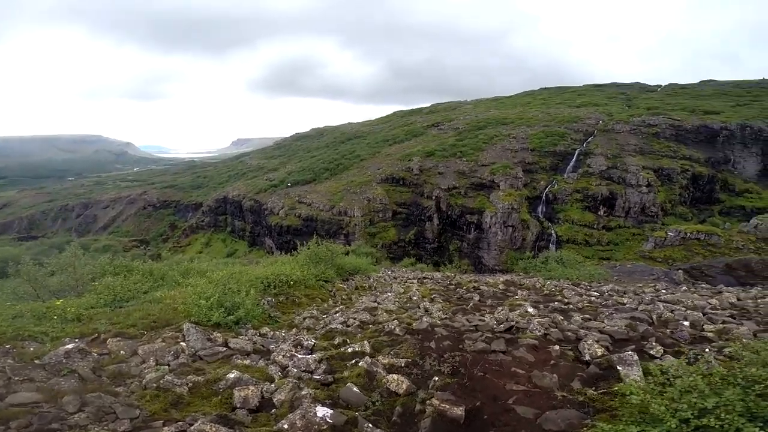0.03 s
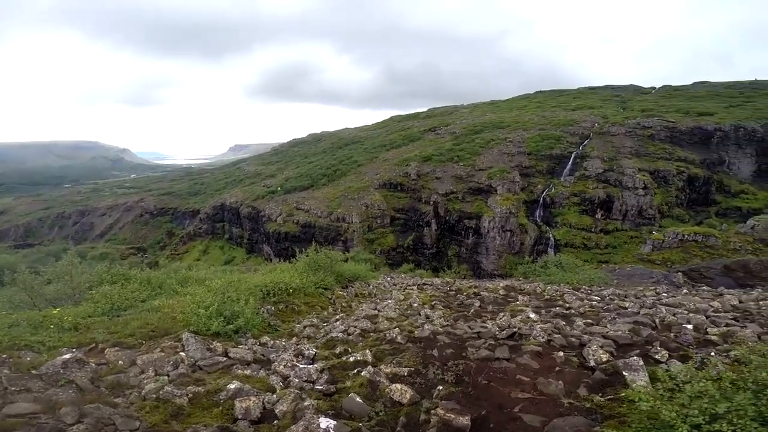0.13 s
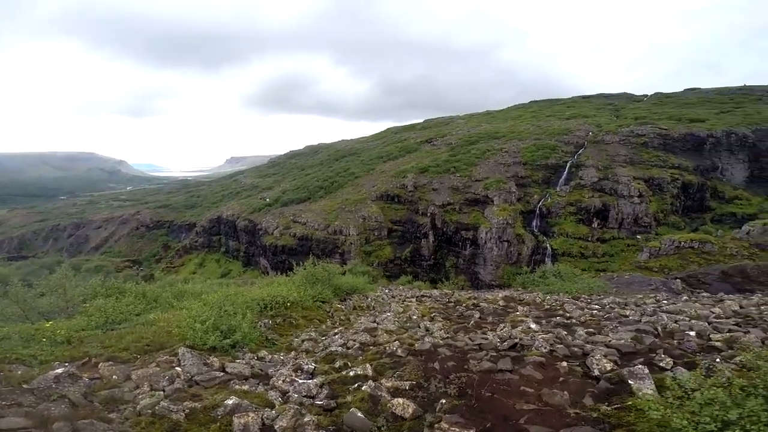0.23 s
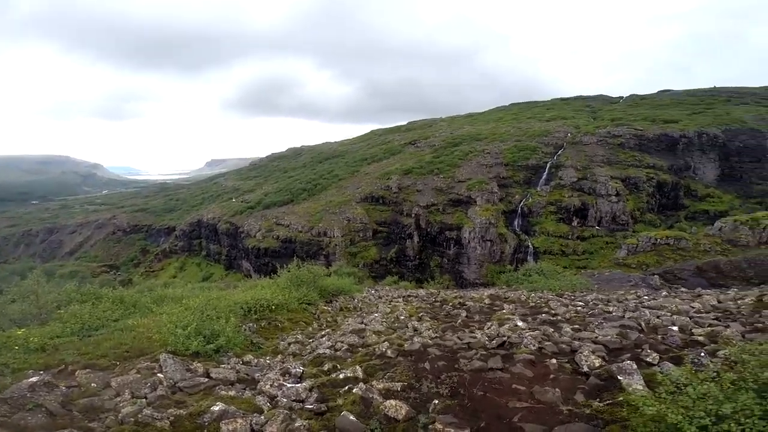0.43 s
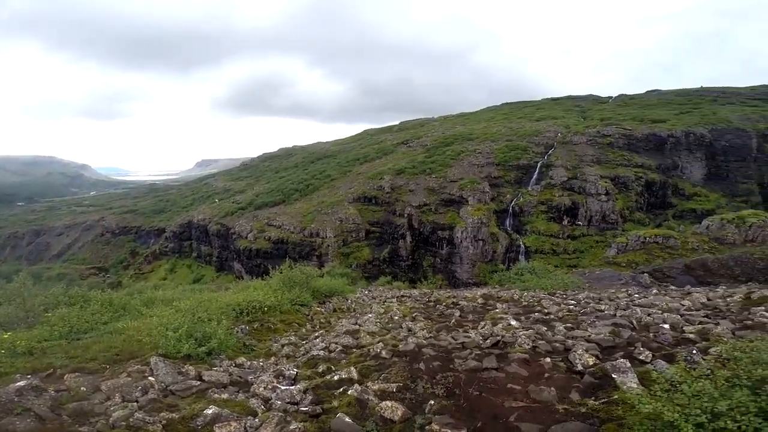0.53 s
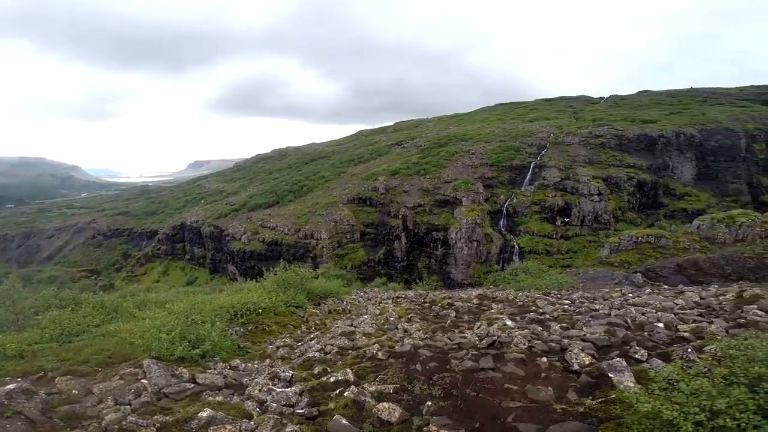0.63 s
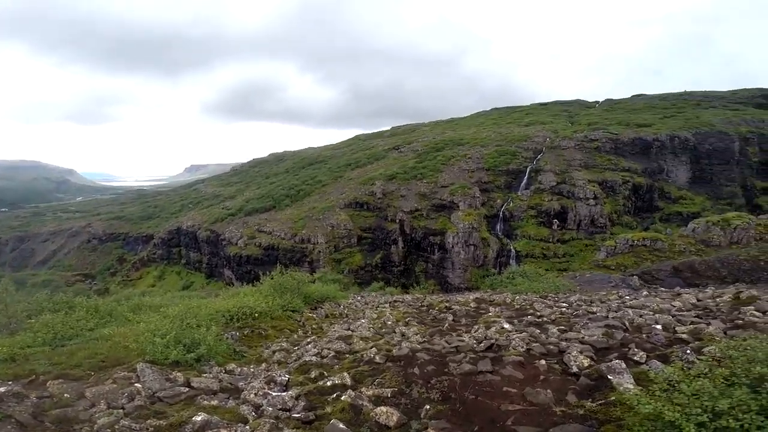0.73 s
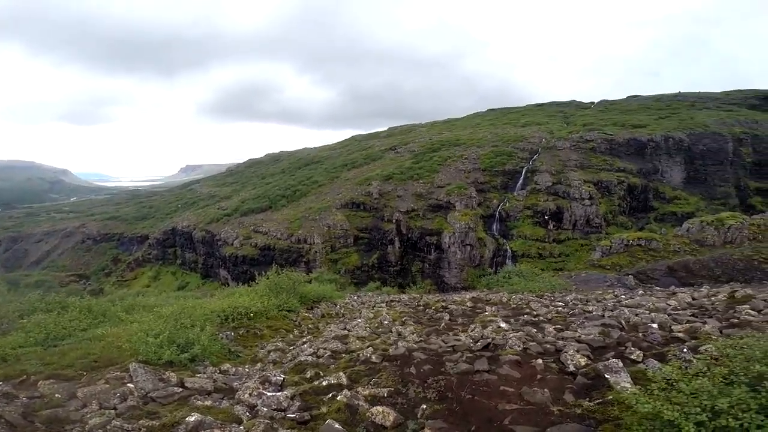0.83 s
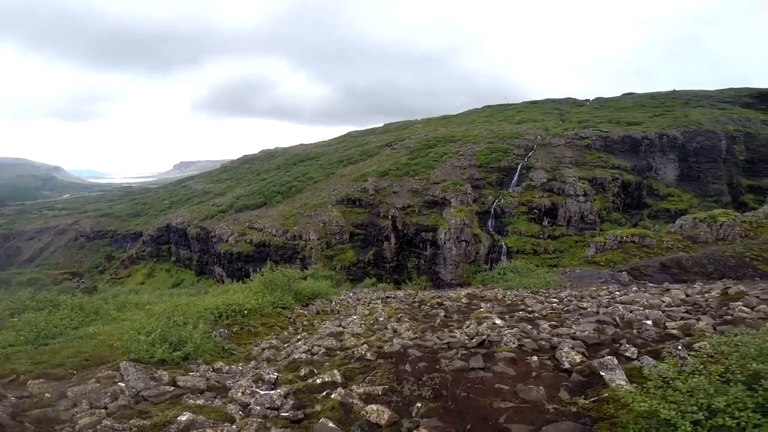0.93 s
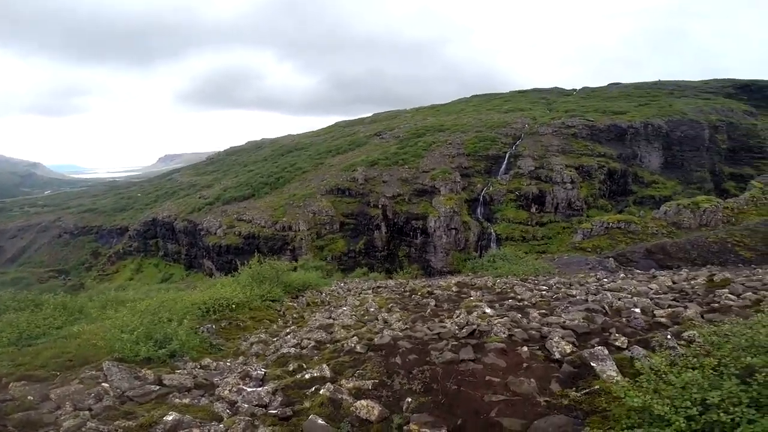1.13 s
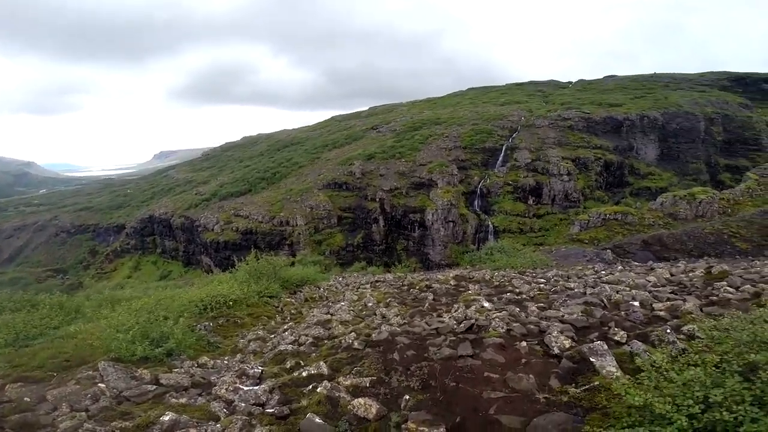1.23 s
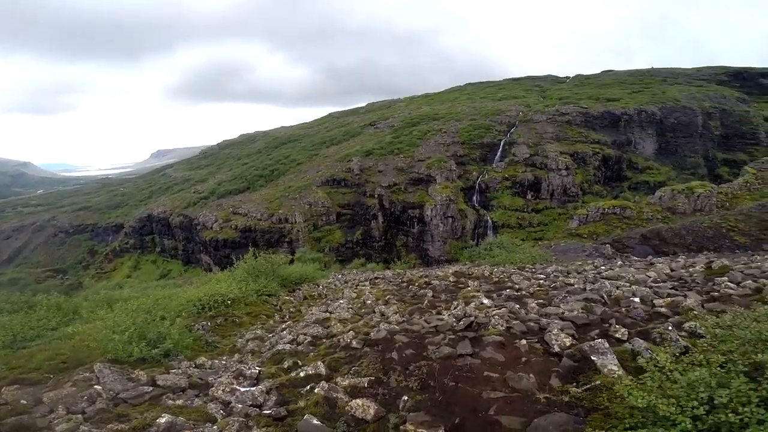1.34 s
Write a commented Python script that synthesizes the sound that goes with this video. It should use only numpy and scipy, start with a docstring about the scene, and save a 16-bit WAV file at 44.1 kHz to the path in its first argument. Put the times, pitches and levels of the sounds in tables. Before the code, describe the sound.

A distant waterfall rushes softly and steadily on an open hillside. At about 0.2 seconds, wind and handling jolt the microphone with a strong, deep thump, a low rumble and two faint ticks. Softer thumps and rumble return from about 0.75 to 1.1 seconds. A light, slightly squeaky rustle rises from 1.25 seconds. A very faint, high electronic whine runs underneath throughout.

```python
"""Distant waterfall on a windy hillside

A far waterfall rushes steadily. Wind and handling jolt a hand-held camera's microphone,
making deep thumps with a rumble after them, and the camera's housing ticks twice.
A light rustle rises at the end, and the electronics whine faintly."""
import sys
import numpy as np
from scipy import signal
from scipy.fft import irfft
from scipy.io import wavfile
from scipy.ndimage import uniform_filter1d

SR = 44100
rng = np.random.default_rng(int(sys.argv[2]) if len(sys.argv) > 2 else 0)


def wav_record(signal):
    """Record a signal, one row per channel, as 16-bit PCM in the file named by sys.argv[1]."""
    frames = np.transpose(np.atleast_2d(signal))
    bounded = np.clip(frames, -1, 1)
    # unit amplitude maps onto the largest positive 16-bit level
    quanta = np.round(bounded * 32767).astype(np.int16)
    wavfile.write(sys.argv[1], SR, quanta)


N = 61739
TIME = np.arange(N) / SR
FREQS = np.fft.rfftfreq(N, 1 / SR)


def gain_of(db):
    """Turn decibels into a number to multiply a sound by."""
    return 10 ** (np.asarray(db) / 20)


def unit_level(sound):
    """Scale a sound so that its average level (rms) is 1."""
    return sound / np.sqrt(np.mean(sound ** 2) + 1e-20)


def random_mix(strengths):
    """Make noise by mixing all frequencies, each starting at a random point in its swing."""
    return unit_level(irfft(strengths * np.exp(2j * np.pi * rng.random(len(FREQS))), N))


def shaped_noise(colour):
    """Noise whose colour, the balance of low and high pitches, follows a table."""
    pitch_hz, level_db = np.transpose(colour)
    return random_mix(gain_of(np.interp(np.log(FREQS + 1), np.log(pitch_hz + 1), level_db)))


def band_noise(pitch_hz, width_hz):
    """Noise gathered around one pitch; around 0 Hz it is a random wobble."""
    return random_mix(np.exp(-2 * ((FREQS - pitch_hz) / width_hz) ** 2))


def swell(peak_s, half_width_s):
    """A smooth rise and fall, highest at peak_s."""
    return np.exp(-((TIME - peak_s) / half_width_s) ** 2)


# The tones of the whine: pitch_hz, level_db
WHINE_TONES = [(2937, -86.5), (5844, -80), (5874, -87.5), (8781, -86), (11688, -101), (11718, -79.5),
               (14625, -92)]

def electronic_whine():
    """The camera's electronics give off faint, high tones that waver a little."""
    whine = np.zeros(N)
    for pitch_hz, level_db in WHINE_TONES:
        waver_hz = 2.7 * band_noise(0, width_hz=9)
        cycles = np.cumsum(pitch_hz + waver_hz) / SR + rng.random()
        whine += gain_of(level_db) * np.sqrt(2) * np.sin(2 * np.pi * cycles)
    return whine


# The moments when the hiss is on: middle_s
HISS_MOMENTS = [.008, .045, .187, .42, .463, .573, .762, .94, .98, 1.162, 1.343]
# The colour of the hiss: pitch_hz, level_db
HISS_COLOUR = [(6000, -28), (10500, -17), (11800, -19), (12150, -5.5), (12550, -7), (12950, -20),
               (14500, -25), (15500, -22)]

def electronic_hiss(length_s=0.033, level_db=-71):
    """A thin, very high hiss from the electronics flickers on and off."""
    on_off = sum(np.exp(-(2 * (TIME - middle_s) / length_s) ** 6) for middle_s in HISS_MOMENTS)
    return gain_of(level_db) * on_off * shaped_noise(HISS_COLOUR)


# The colour of the rubbing: pitch_hz, level_db
RUSTLE_COLOUR = [(1000, -6), (2050, -13), (2550, 5), (3200, -10), (5000, -11.5), (6000, 2), (6500, -12.5),
                 (7200, -6.5), (8200, -28), (15000, -43)]

def rustle(start_s=1.25, fade_in_s=0.076, squeak_hz=2450, climb_hz_per_s=1100):
    """Soft rubbing near the microphone fades in, with a thin, raspy squeak that climbs in pitch."""
    elapsed_s = np.maximum(TIME - start_s, 0)
    cycles = np.cumsum(squeak_hz + climb_hz_per_s * elapsed_s) / SR
    # Two random wobbles roughen the pure tone into a rasp.
    rasp = band_noise(0, width_hz=150) + 1j * band_noise(0, width_hz=150)
    squeak = gain_of(-66.5) * (rasp * np.exp(2j * np.pi * cycles)).real
    rubbing = gain_of(-64) * shaped_noise(RUSTLE_COLOUR)
    return (rubbing + squeak) * np.minimum(elapsed_s / fade_in_s, 1)


def tick(peak_s, level_db, half_width_s, pitch_hz, width_hz):
    """One dry tick: a very short puff of noise."""
    shape = swell(peak_s, half_width_s)
    puff = unit_level(shape * band_noise(pitch_hz, width_hz))
    return gain_of(level_db) * puff * np.sqrt(np.mean(shape ** 2))


# The colour of the scuff: pitch_hz, level_db
SCUFF_COLOUR = [(100, -3), (250, 6), (600, -7.5), (1500, -12), (2600, -12), (5000, -23), (12000, -50)]
# Ticks (the last two blend into one): peak_s, level_db, half_width_s, pitch_hz, width_hz
HOUSING_TICKS = [(0.2515, -47.5, 0.0016, 2300, 610), (0.28, -48, 0.001, 2520, 400),
                 (0.2837, -53, 0.0018, 2660, 400)]

def housing():
    """The hardest jolt scuffs the camera's housing, which ticks, first with a dull knock."""
    scuff = gain_of(-55.5) * swell(peak_s=0.217, half_width_s=0.026) * shaped_noise(SCUFF_COLOUR)
    ticks = sum(tick(*row) for row in HOUSING_TICKS)
    peak_s, _, half_width_s, _, _ = HOUSING_TICKS[0]
    knock = tick(peak_s, level_db=-45, half_width_s=half_width_s, pitch_hz=1110, width_hz=2400)
    return scuff + ticks + knock


# The colour of the wind's rumble: pitch_hz, level_db
WIND_COLOUR = [(10, -10.5), (24, 1.5), (40, 2.5), (62, -1), (80, -10), (110, -21), (200, -31), (500, -59),
               (3000, -130)]
# How loud the wind is as time passes: time_s, level_db
WIND_LEVELS = [(0, -61.5), (.12, -57), (.18, -51), (.23, -33.5), (.3, -38.5), (.35, -51), (.41, -53),
               (.735, -53), (.78, -45.5), (.86, -43), (.98, -50), (1.12, -51), (1.4, -52.5)]

def wind():
    """Air swirling at the microphone makes a low rumble that swells and eases."""
    time_s, level_db = np.transpose(WIND_LEVELS)
    return shaped_noise(WIND_COLOUR) * gain_of(np.interp(TIME, time_s, level_db))


# Jolts to the microphone: peak_s, level_db, half_width_s, pitch_hz, slide_octaves_per_s
JOLTS = [(0.2312, -12, 0.018, 41.3, 12), (0.267, -25, 0.0091, 58, 0), (0.375, -36.5, 0.017, 35.3, -4),
         (0.757, -27.5, 0.02, 58.5, 2.5), (0.811, -29.5, 0.024, 42, 0), (0.928, -41, 0.033, 63, -5.5),
         (1.072, -38.5, 0.02, 53, 0)]

def thumps():
    """Each jolt makes a few slow swings of pressure, heard as a deep thump."""
    sound = np.zeros(N)
    for peak_s, level_db, half_width_s, pitch_hz, slide_octaves_per_s in JOLTS:
        octaves = np.clip(slide_octaves_per_s * (TIME - peak_s), -1, 1)
        cycles = np.cumsum(pitch_hz * 2 ** octaves) / SR
        cycles -= np.interp(peak_s, TIME, cycles)  # put the biggest swing at peak_s
        sound += gain_of(level_db) * swell(peak_s, half_width_s) * np.cos(2 * np.pi * cycles)
    return sound


# The colour of the far water: pitch_hz, level_db
WATER_COLOUR = [(60, -7.5), (120, -12), (200, -13.5), (320, -16), (550, -19), (900, -21), (1250, -20.5),
                (1750, -20.5), (2020, -26.5), (2550, -20.5), (3150, -29), (3900, -28.5), (4500, -24.5),
                (5400, -28.5), (5900, -28.5), (6300, -34.5), (8000, -39.5), (10500, -43), (11600, -39),
                (12600, -49), (14000, -47), (15000, -48)]

def waterfall(level_db=-56, drift_db=0.5, patch_hz=500, patch_s=0.056):
    """Far falling water makes a smooth rush whose low and high parts drift a little in level."""
    # Split the noise into a grid: rows are pitches, columns are moments.
    grid = signal.stft(shaped_noise(WATER_COLOUR), nperseg=512, noverlap=384)[2]
    patch_rows, patch_columns = round(patch_hz * 512 / SR), round(patch_s * SR / 128)
    # Blur random numbers into louder and softer patches.
    patches = uniform_filter1d(rng.standard_normal(grid.shape), patch_rows, axis=0)
    patches = unit_level(uniform_filter1d(patches, patch_columns, axis=1))
    rush = signal.istft(grid * gain_of(drift_db * patches), nperseg=512, noverlap=384)[1][:N]
    return gain_of(level_db) * unit_level(rush)


def scene():
    """Add up all the sounds at one microphone."""
    mix = waterfall() + wind() + thumps() + housing() + rustle() + electronic_whine() + electronic_hiss()
    return mix[None]


def record(dry):
    """The camera cuts away the very highest treble."""
    cutoff_hz = 15200
    treble_cut = signal.firwin(511, cutoff_hz, window=("kaiser", 9), fs=SR)
    return signal.oaconvolve(dry, treble_cut[None], "same")


dry = scene()
out = record(dry)
wav_record(out)
```